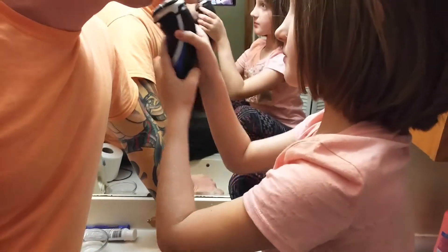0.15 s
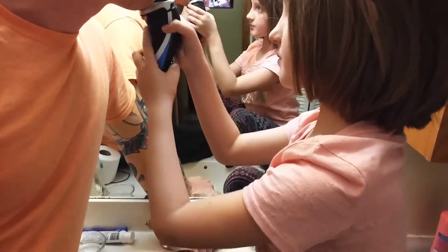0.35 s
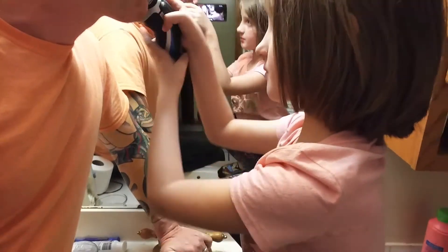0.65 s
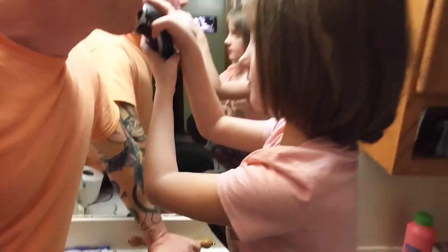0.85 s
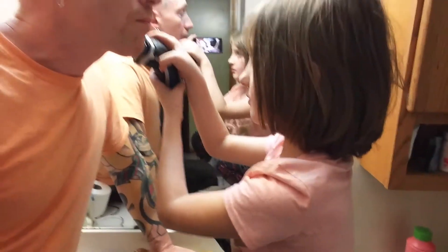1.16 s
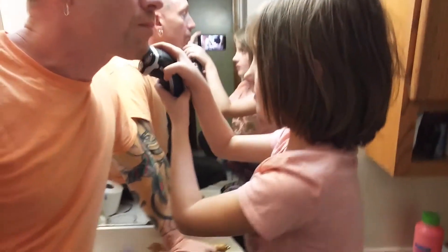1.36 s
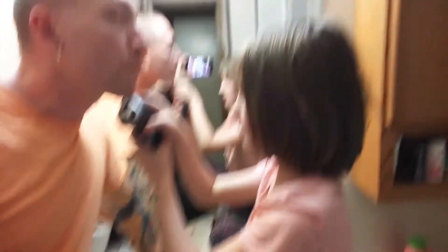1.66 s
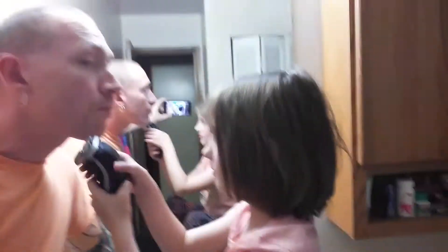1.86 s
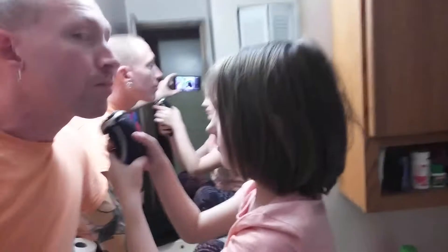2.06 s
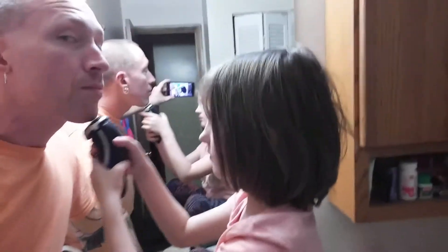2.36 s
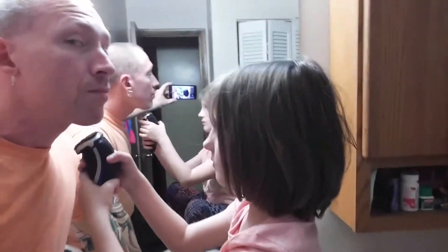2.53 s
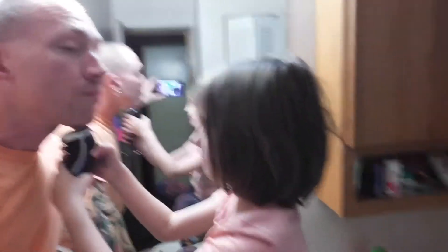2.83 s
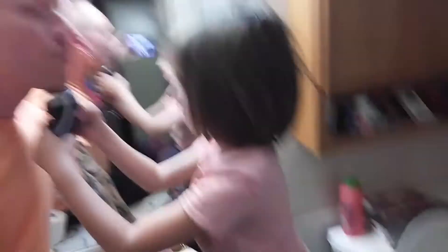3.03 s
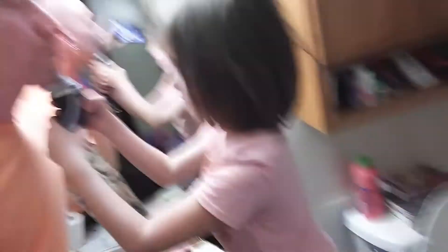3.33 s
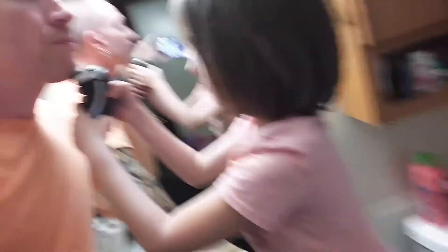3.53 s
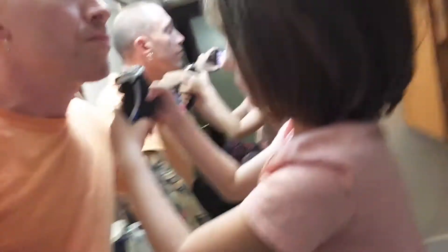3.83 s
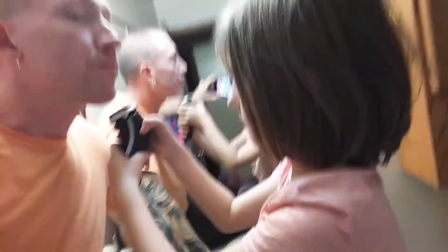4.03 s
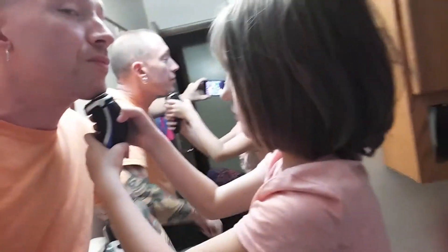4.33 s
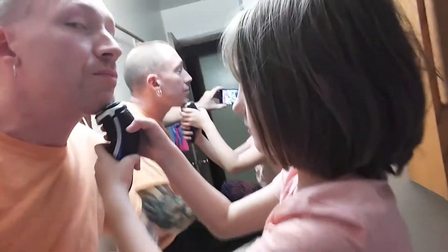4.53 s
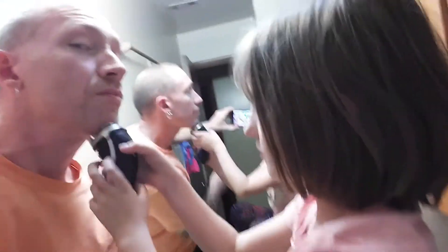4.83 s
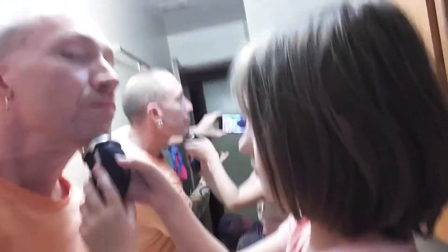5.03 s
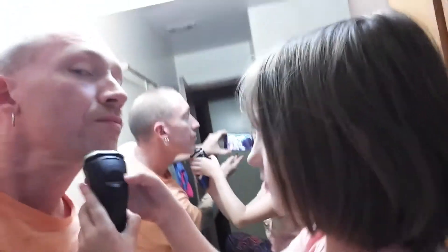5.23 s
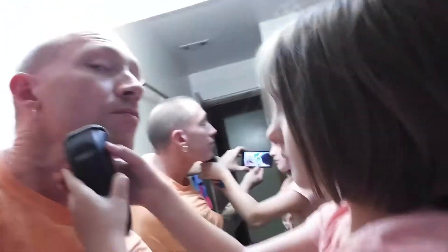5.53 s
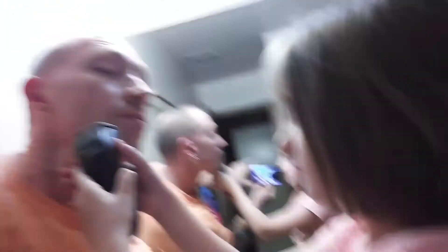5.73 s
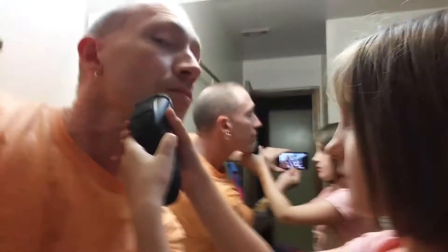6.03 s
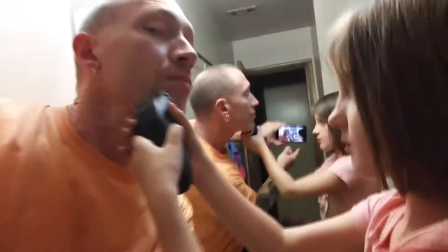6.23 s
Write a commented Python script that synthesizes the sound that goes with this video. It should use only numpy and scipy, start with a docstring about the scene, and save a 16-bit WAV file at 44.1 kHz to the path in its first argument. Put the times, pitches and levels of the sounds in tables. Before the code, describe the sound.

A rotary electric shaver is already running at 0 s and never stops through 6.4 s, very close to a handheld stereo camera in a small bathroom. Its steady whine, around 1.3 kHz, sits under a harsh buzz near 4 kHz and thin metallic ringing near 7 to 8 kHz, wavering slightly with pressure. A squeal opens the first third of a second. Stubble hisses and crackles in strokes; a brief rattle catches at 0.8 s. From 1.7 to 3.1 s the squealing grows clearer and piercing, with a catch at 2.5 s. Rougher catches follow at 3.4 to 4.5 s, then looser knocking rattle after 5.2 s as the ringing weakens. Soft dull camera bumps fall near 1.9, 2.05, 2.9, 3.8, 4.5 and 6.2 s, stronger right. One needle-sharp tick strikes left at 5.4 s. Mains hum and short reflections lie underneath; the shaver drifts from slightly right to left.

```python
"""A rotary shaver whines, buzzes and squeals at once as it moves over a man's chin in a small bathroom.
One motor shaft sets the pitches: gear teeth whine, blades sweep slots, thin metal heads ring and squeal.
Cutters rattle once a turn, stubble hisses as shaped noise with snaps, and mains hum lies below.
Later come a few soft bumps of the hand on the nearby handheld camera, and one sharp tick on the left."""
import sys
import numpy as np
from scipy import signal
from scipy.fft import rfft, irfft
from scipy.io import wavfile
from scipy.ndimage import uniform_filter1d

SR = 44100
rng = np.random.default_rng(int(sys.argv[2]) if len(sys.argv) > 2 else 0)


def dump_mix(stems):
    """Bounce the given channels to the path in sys.argv[1] as a 16-bit WAV at rate SR."""
    frames = np.atleast_2d(stems).T  # one column per channel
    limited = np.clip(frames, -1, 1)  # hard clip at full scale
    pcm = np.round(limited * 32767).astype(np.int16)
    wavfile.write(sys.argv[1], SR, pcm)


N = 281358
TIME = np.arange(N) / SR  # seconds
BINS = np.fft.rfftfreq(N, 1 / SR)  # Hz

GEAR_RATIO = 32.862 / 9  # shaft turns per cutter turn
PINION_TEETH, SLOTS, WHEEL_TEETH = 9, 90, 48
USUAL_SPEED = 150  # shaft turns per second


def amp(db):
    """Decibels to gain."""
    return 10 ** (np.asarray(db) / 20)


def unit(x):
    """Scales to rms 1."""
    return x / np.sqrt(np.mean(x ** 2) + 1e-20)


def noise(channels=2):
    """White noise: an even hiss, different in each channel."""
    return rng.standard_normal((channels, N))


def curve(rows):
    """Draws straight lines between the rows of a timed table, for each column."""
    s, *columns = np.transpose(rows)
    return np.squeeze([np.interp(TIME, s, c) for c in columns])


def across(points):
    """Reads a table over frequency at every bin, along a logarithmic axis."""
    hz, value = np.transpose(points)
    return np.interp(np.log(BINS + 1), np.log(hz), value)


def shaped(x, response):
    """Filters by a frequency response; rms 1."""
    return unit(irfft(rfft(x) * response, N))


def resonance(hz, width):
    """Response of one damped mode, a part that likes to swing at one pitch."""
    return 1j * BINS * width / (hz ** 2 - BINS ** 2 + 1j * BINS * width)


def moving_mode(x, hz, width):
    """A resonance whose pitch follows the curve hz."""
    turn = np.exp(2j * np.pi * np.cumsum(hz) / SR)
    r = np.exp(-np.pi * width / SR)
    # slide the pitch down to zero, smooth there, and slide it back
    smooth = signal.lfilter([1 - r], [1, -r], x / turn)
    return 2 * (turn * smooth).real


def wander(hz):
    """Slow random drift, mostly below hz; rms 1."""
    return shaped(rng.standard_normal(N), 1 / (1 + (BINS / hz) ** 2))


def swell(s, half_length):
    """A smooth rise and fall around the time s, of height 1."""
    return np.exp(-((TIME - s) / half_length) ** 2)


def held(start, length, edge):
    """Attack, hold and release, of height 1."""
    return np.clip(.5 + np.minimum(TIME - start, start + length - TIME) / edge, 0, 1)


# How alike noise is on the left and right.
# Each row: frequency in Hz, coherence from 0 (unrelated) to 1 (the same).
LIKENESS = [(50, 1), (150, 0.95), (350, 0.92), (700, 0.49), (1200, 0.07), (2500, 0.021), (5000, 0.019),
            (12000, 0.022)]


def pair(x):
    """Mixes two unrelated signals until they are partly alike, as at two microphones."""
    a, b = rfft(x)
    angle = np.arcsin(np.clip(across(LIKENESS), 0, 1)) / 2
    left = a * np.cos(angle) + b * np.sin(angle)
    right = b * np.cos(angle) + a * np.sin(angle)
    return irfft(np.array([left, right]), N)


def each_turn(turns, count):
    """An uneven pattern that repeats with every turn of a wheel."""
    waves = [np.sin(2 * np.pi * (k * turns + rng.random())) / np.sqrt(k) for k in range(1, count + 1)]
    return unit(sum(waves))


def tooth_tone(turns, teeth, wobble, jitter):
    """Teeth passing on a slightly eccentric wheel: a tone with sidebands one turn apart."""
    phase = 2 * np.pi * teeth * turns + wobble * each_turn(turns, count=3) + jitter * wander(26)
    # standing waves in the small room shift the phase between the microphones as the hand moves
    shift = np.outer([1, -1], .55 + .15 * wander(2))
    return np.sqrt(2) * np.sin(phase + shift)


# The pinion's whine, before small random changes. Each row: time in seconds, level in dB.
WHINE = [(0, -46), (.33, -48.5), (.57, -41), (.84, -39.5), (.95, -51.5), (1.08, -40), (1.27, -46.5),
         (1.87, -58), (2.05, -44.5), (2.82, -45), (2.92, -55.5), (3.8, -51.5), (5.05, -58), (5.17, -45),
         (5.55, -54), (5.95, -54), (6.08, -46.5), (6.38, -52.5)]
# Weaker tones of the motor. Each row: multiple of the shaft rate, level in dB before random changes.
MOTOR_ORDERS = [(3, -67), (5, -64.5), (6, -63), (7, -61.5), (8, -65), (13, -61), (14, -58), (15, -60),
                (16, -57)]


def motor(shaft):
    """Passing pinion teeth make a whine; weaker tones lie at other multiples of the shaft rate."""
    whine_tone = tooth_tone(shaft, PINION_TEETH, wobble=.05, jitter=.12)
    out = amp(curve(WHINE) + 1.2 * wander(6)) * whine_tone
    for order, db in MOTOR_ORDERS:
        out = out + amp(db + 3 * wander(2)) * tooth_tone(shaft, round(order), wobble=.05, jitter=.3)
    return out


# How the cutters sit; the rattle below uses this too.
# Each row: time in seconds, base level of the blades in dB at the usual speed, rattle in dB,
# knock strength, factor on the housing's pitch as the grip changes.
GRIP = [(0, -36, -41.5, .5, 1.01), (.5, -40, -46.5, .28, 1.02), (.95, -41.5, -65, .2, 0.79),
        (1.3, -41.5, -61, .17, 0.95), (2.0, -46.5, -43.5, .4, 0.983), (2.55, -41, -47, 0.69, .97),
        (2.85, -40.5, -47, .7, 1.04), (3.3, -44, -41, 1.2, 0.95), (3.75, -39.5, -42.5, 0.43, 1.14),
        (4.3, -40.5, -45.5, 0.53, 1.066), (4.95, -46.5, -44, 0.76, 0.96), (5.55, -42, -38, 1.6, 0.98),
        (6.38, -45, -37.5, 1.2, 0.96)]
# The cutters catch on hairs; the rattle uses this too.
# Each row: time in seconds, half length in seconds, rise of the rattle in dB, rise of the blades in dB.
CATCHES = [(0.447, 0.05, -2, 6.5), (.79, 0.027, 15, -3), (2.504, 0.033, 8.5, 3.5), (3.42, 0.043, 4.5, -4),
           (3.664, 0.06, 6.5, -0.5), (4.296, .025, 8, -11), (4.493, 0.061, 5.5, -5)]
BLADES_DB_PER_TURN = 0.97  # dB for each extra shaft turn per second


def tilting():
    """The floating heads tilt, so the blades run off-centre: a slowly drifting phase swing in radians."""
    mean_swing, tilt_share, tilt_hz = .75, .45, 2.5
    return mean_swing * (1 + tilt_share * wander(tilt_hz))


def blades(turns, contact, speed):
    """Blades sweep the slots, harder once a turn and louder at speed; the cutter wheels mesh beside them."""
    press = 1 + .22 * np.cos(2 * np.pi * turns) + .17 * contact
    sweep = unit(tooth_tone(turns, SLOTS, wobble=tilting(), jitter=.2) * press)
    chatter = shaped(noise() * press, resonance(3720, 260) ** 2)
    mesh = tooth_tone(turns, 2 * WHEEL_TEETH, wobble=tilting(), jitter=.3)
    low_mesh = tooth_tone(turns, WHEEL_TEETH, wobble=.7, jitter=.25)
    mix = amp(2.0) * sweep + amp(-10) * chatter + amp(-6.5) * mesh + amp(-11) * low_mesh
    speed_db = BLADES_DB_PER_TURN * (speed - USUAL_SPEED)
    catch_db = sum(rise * swell(s, half) for s, half, _, rise in CATCHES)
    return amp(curve(GRIP)[0] + speed_db + catch_db) * mix


# The heads break into a squeal.
# Each row: start in seconds, length in seconds, rise in dB, added share of clean tone (0-1).
SQUEALS = [(0.01, 0.33, 5, 0.4), (1.712, 0.39, 6.5, 0.26), (2.114, 0.42, 2.5, .25), (2.476, .28, 4.5, 0.56),
           (2.75, 0.38, 7.5, 0.6)]
SQUEAL_EDGE_S = 0.077
RING_DB = -31  # base level at the usual speed and time 0
RING_DB_PER_TURN = 1  # dB for each extra shaft turn per second
RING_FADE_DB_PER_S = 0.48  # the ringing slowly weakens as the shaver moves round the chin
RING_PULSE_DB = 1  # the heads ring harder once in every turn of the cutters
TONE_SHARE = .06  # clean part of the ringing outside the squeals (0-1)


def heads(turns, contact, speed):
    """Thin metal heads ring in uneven bursts, their pitch moving with speed; squeals are louder, cleaner."""
    pulse_db = RING_PULSE_DB * np.cos(2 * np.pi * turns)
    bursts = unit(amp(pulse_db + 1.0 * contact + 1.04 * wander(78)))
    modes = resonance(7420, 390) ** 2 + amp(-9) * resonance(8000, 450) ** 2
    scrape = shaped(pair(noise()), modes)
    # shift the ringing up and down with the changes in twice the slot rate
    shift_hz = (speed - speed.mean()) * 2 * SLOTS / GEAR_RATIO
    drift = np.exp(2j * np.pi * np.cumsum(shift_hz) / SR)
    scrape = (signal.hilbert(scrape) * drift).real
    tone = tooth_tone(turns, 2 * SLOTS, wobble=tilting(), jitter=.3)

    squeal_db, clean = 0, TONE_SHARE
    for start, length, rise_db, share in SQUEALS:
        squealing = held(start, length, SQUEAL_EDGE_S)
        squeal_db = squeal_db + rise_db * squealing
        clean = clean + share * squealing
    clean = np.clip(clean, 0, 1)
    speed_db = RING_DB_PER_TURN * (speed - USUAL_SPEED)
    level = amp(RING_DB + speed_db - RING_FADE_DB_PER_S * TIME + squeal_db) * bursts
    return level * np.sqrt(clean) * tone, level * np.sqrt(1 - clean) * scrape


# Resonances of the plastic housing, each used twice in a row.
# Each row: pitch in Hz before the grip factor, width in Hz of one pass, relative level in dB.
HOUSING = [(1960, 220, -2), (2120, 220, 0), (2340, 220, -7)]
# Low resonances of the handle, each used twice in a row.
# Each row: pitch in Hz, width in Hz of one pass, relative level in dB.
HANDLE = [(741, 125, -2.5), (1026, 220, -8.5)]
# Murmur of the handle, louder as the shaver is tilted up. Each row: time in seconds, base level in dB.
MURMUR = [(0, -57.5), (1.5, -52.5), (2.6, -66), (3.1, -47), (4.2, -53.5), (4.9, -47), (5.5, -50.5),
          (6.38, -50.5)]


def rattle(turns):
    """Once a turn the cutters knock in their seats and ring the housing; bearings murmur in the handle."""
    _, rattle_db, looseness, grip = curve(GRIP)
    catch_db = sum(rise * swell(s, half) for s, half, rise, _ in CATCHES)
    angle = turns % 1
    knocks = .33 + looseness * np.exp(-angle / .07)
    # part of the roughness repeats with every turn
    track = np.linspace(0, 1, 1024)
    repeating = unit(np.interp(angle, track, rng.standard_normal(len(track))))
    bearing = repeating + .95 * pair(noise())
    drive = bearing * knocks
    # even out the loudness over quarter seconds, keeping the knocks
    drive /= np.sqrt(uniform_filter1d((drive ** 2).mean(0), size=SR // 4))
    shell = 0
    for hz, width, db in HOUSING:
        once = moving_mode(drive, hz * grip, width)
        shell = shell + amp(db) * unit(moving_mode(once, hz * grip, width))
    murmur = sum(amp(db) * shaped(bearing, resonance(hz, width) ** 2) for hz, width, db in HANDLE)
    return amp(rattle_db + catch_db) * unit(shell) + amp(curve(MURMUR)) * murmur


# Steady rubbing on the skin. Each row: time in seconds, body in dB, fizz in dB (both base levels).
RUB = [(0, -32, -32), (.6, -30.5, -32), (.95, -34, -33.5), (1.35, -30.5, -30), (1.88, -33, -29),
       (2.27, -32.5, -34), (2.95, -33.5, -31), (3.25, -31.5, -33.5), (3.8, -31.3, -32.7),
       (4.4, -32.5, -35.5), (5.0, -31.5, -33.3), (5.7, -32.5, -34.5), (6.38, -32, -38)]
# Tone colour of the body, the fuller part. Each row: frequency in Hz, relative level in dB.
RUB_BODY = [(450, -66), (530, -21.5), (620, -8.5), (800, -9), (1150, -10), (1600, -1.5), (2500, -2),
            (3100, -0.5), (4000, 4.5), (4500, -1), (5600, 2.5), (6700, 3), (8000, 2.5), (12000, -10)]
# Tone colour of the fizz, the bright part. Each row: frequency in Hz, relative level in dB.
RUB_FIZZ = [(4000, -25), (6500, -4.5), (7200, 5.5), (7800, 0), (8200, 0.5), (9000, -2), (10000, -6),
            (11200, -8.5), (12200, -17.5), (14000, -14), (14900, -6), (16000, -6)]
# Short strokes through the stubble. Each row: time in seconds, half length in seconds,
# rise of the body in dB, rise of the fizz in dB, lisp (a narrow hiss) in dB.
STROKES = [(.01, 0.044, 5.5, 4.5, -31), (.22, 0.25, .5, 1.5, -38), (0.743, 0.052, 1.5, 4, -42),
           (1.29, 0.041, 1.5, 4, -52), (1.5, .04, 1.5, 0.5, -54), (1.592, .025, 2, 0, -37),
           (2.888, 0.073, 3.5, 1.5, -46), (3.635, 0.049, 4, 2.5, -38), (4.02, 0.017, 1.5, 4.5, -52),
           (5.04, 0.017, 1.5, 6, -52), (5.82, 0.043, 3.5, -8, -55)]


def stubble(contact):
    """Steel rubs on skin with a hiss that changes with each stroke; single hairs snap in it."""
    body_db, fizz_db = curve(RUB)
    lisp_gain = np.zeros(N)
    for s, half, body_rise, fizz_rise, lisp_db in STROKES:
        stroke = swell(s, half)
        body_db = body_db + body_rise * stroke
        fizz_db = fizz_db + fizz_rise * stroke
        lisp_gain += amp(lisp_db) * stroke
    snap_now = rng.random(N) < 700 / SR  # about 700 a second
    snap_size = amp(4 * np.minimum(rng.exponential(1, N), 3))
    snaps = snap_now * snap_size * rng.choice([-1, 1], (2, N))
    flutter = amp(.5 * contact + .5 * wander(19))
    friction = pair(noise() + 0.33 * unit(snaps)) * flutter
    body = amp(body_db) * shaped(friction, amp(across(RUB_BODY)))
    # 1j: a quarter-turn phase shift against the body
    fizz = amp(fizz_db) * shaped(friction, 1j * amp(across(RUB_FIZZ)))
    lisp = lisp_gain * shaped(pair(noise()), resonance(5540, 290) ** 2)
    return body + fizz + lisp


def bathroom(x, wet_db, t60):
    """Adds dense reflections from near walls, different at each microphone, fading 60 dB in t60 seconds."""
    t = TIME[:SR // 2]
    hits = rng.standard_normal((2, len(t))) * (rng.random((2, len(t))) < 1 / 20)
    taps = hits * amp(-60 * t / t60) * (t > .003)
    taps /= np.linalg.norm(taps, axis=1, keepdims=True)
    reflections = signal.fftconvolve(x, taps, axes=1)[:, :N]
    return (x + amp(wet_db) * reflections) / np.sqrt(1 + amp(wet_db) ** 2 / 2)


# Tone colour of the quiet room. Each row: frequency in Hz, relative level in dB.
ROOM_TONE = [(20, -26), (40, -13), (55, -3.5), (75, 5.5), (110, -4), (200, -1), (400, -2), (450, -4.5),
             (510, -31), (600, 0), (2000, -22), (16000, -54)]


def background():
    """A 60 Hz mains hum of uneven level over the low murmur of the room, made of shaped noise."""
    hum = np.sqrt(2) * np.sin(2 * np.pi * 60 * TIME + np.array([[0], [.5]]))
    murmur = shaped(pair(noise()), amp(across(ROOM_TONE)))
    left_right = amp([[-1.5], [1]])
    return amp(-56.5) * hum * amp(2.7 * wander(8)) + amp(-51.5) * murmur * left_right


def thump(s, decay):
    """A quick rise and dying away from the time s, reaching height 1 after decay seconds."""
    age = np.maximum(TIME - s, 0)
    return age / decay * np.exp(1 - age / decay)


# Soft bumps of the hand on the camera.
# Each row: start in seconds, level in dB before left and right are set, pitch in Hz, decay in seconds.
BUMPS = [(1.873, -34, 138, 0.002), (1.875, -26, 305, 0.0014), (1.99, -32, 224, 0.00083),
         (2.055, -47.5, 282, 0.023), (2.916, -31.5, 171, 0.0028), (2.919, -28.5, 340, 0.0024),
         (3.797, -31, 190, 0.0016), (4.456, -47, 134, 0.0096), (6.225, -40.5, 162, 0.006)]


def bumps():
    """Each bump is a light tap and a short dull shudder of the camera's case, stronger on the right."""
    out = np.zeros((2, N))
    for s, db, hz, decay in BUMPS:
        age = np.maximum(TIME - s, 0)
        swing = np.sin(2 * np.pi * hz * age + .5 * wander(150) + np.array([[1.2], [0]]))
        tap = shaped(rng.standard_normal(N), resonance(2.5 * hz, 3 * hz) ** 2)
        out += amp(db) * thump(s, decay) * (swing + 0.33 * tap)
    return out * amp([[-5], [5]])


def tick(start, db, hz, decay):
    """One very short, bright tick: a tone that dies almost at once, 20 dB weaker on the right."""
    age = np.maximum(TIME - start, 0)
    return amp(db) * np.sin(2 * np.pi * hz * age) * thump(start, decay) * amp([[0], [-20]])


# The motor sags when the heads are pressed on the skin.
# Each row: time in seconds, shaft turns per second before a tiny random drift.
SPEED = [(0, 148), (.12, 151.3), (.38, 149.2), (.55, 150.4), (.8, 150.8), (1.25, 148.4), (1.7, 151.5),
         (2.75, 152.5), (3.1, 149.8), (3.62, 147), (3.8, 151.6), (4.2, 152.3), (4.7, 148.9), (4.95, 148.5),
         (5.25, 152), (6.1, 150.4), (6.38, 149.1)]
# Where the shaver is. Each row: time in seconds, left minus right in dB.
PAN = [(0, -2), (.5, -1), (2.0, -3.5), (2.3, -1.5), (2.65, -4), (3.3, -.7), (3.9, -1.7), (4.4, .5),
       (5.4, 0.3), (6.38, 2.5)]


def scene():
    """One shaft drives every part of the shaver; the background, bumps and tick are added to it."""
    speed = curve(SPEED)
    shaft = np.cumsum(speed * (1 + .0003 * wander(8))) / SR  # turns so far
    turns = shaft / GEAR_RATIO  # cutter turns so far
    contact = each_turn(turns, count=6)
    whine = motor(shaft)
    sweep = blades(turns, contact, speed)
    squeal, scrape = heads(turns, contact, speed)
    buzz = bathroom(sweep + squeal + rattle(turns), wet_db=-10, t60=.25)
    left_right = amp(np.outer([1, -1], curve(PAN)) / 2)
    shaver = (whine + buzz + scrape + stubble(contact)) * left_right
    return shaver + background() + bumps() + tick(start=5.42022, db=-.6, hz=7400, decay=.000065)


def record(dry):
    """A steep low-pass filter removes what lies above about 15950 Hz."""
    low_pass = signal.firwin(511, 15950, window=("kaiser", 9), fs=SR)
    return signal.oaconvolve(dry, low_pass[None], "same")


dry = scene()
out = record(dry)
dump_mix(out)
```